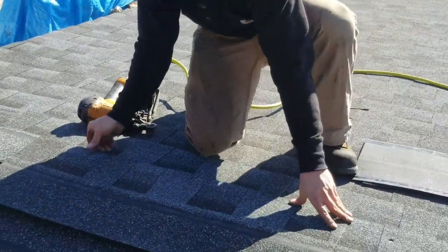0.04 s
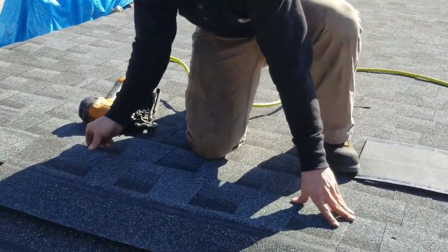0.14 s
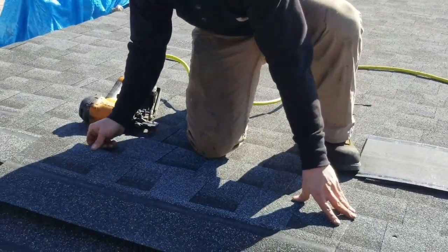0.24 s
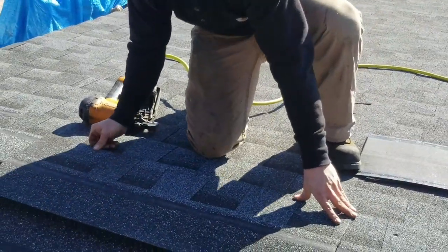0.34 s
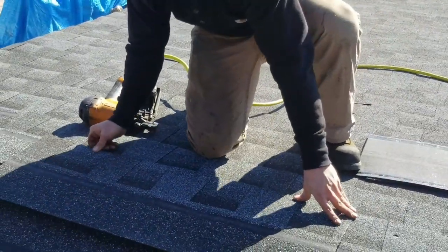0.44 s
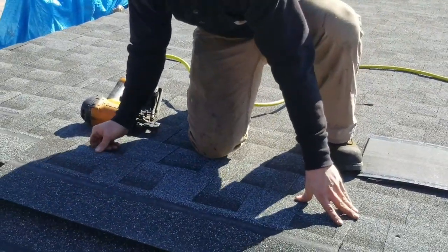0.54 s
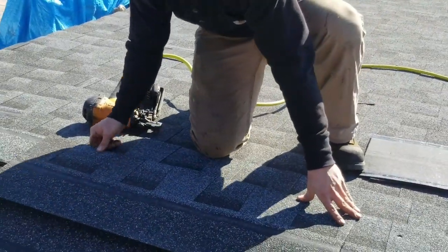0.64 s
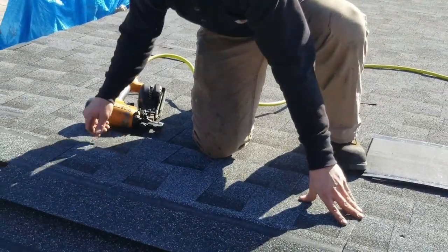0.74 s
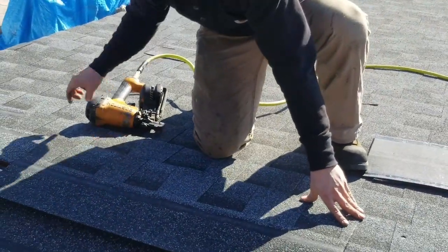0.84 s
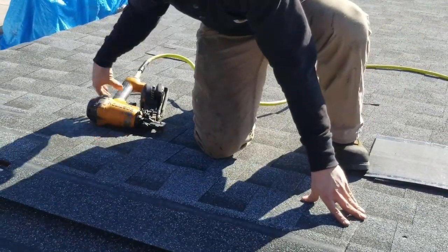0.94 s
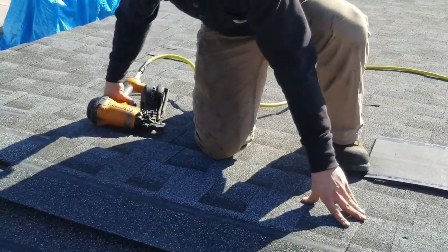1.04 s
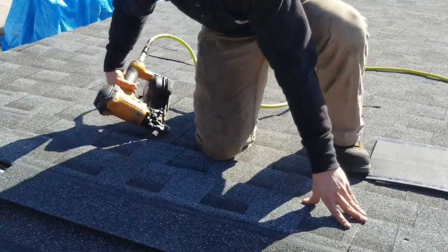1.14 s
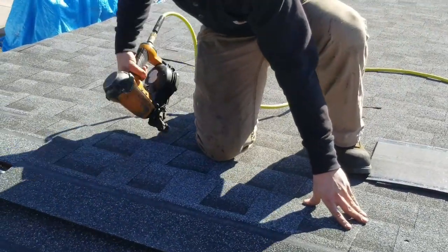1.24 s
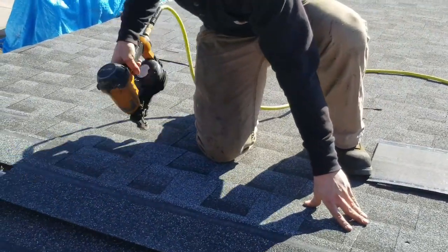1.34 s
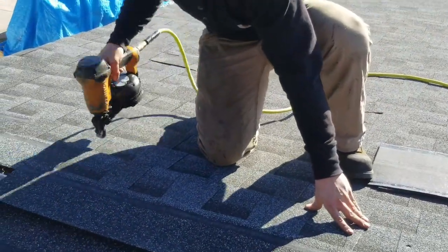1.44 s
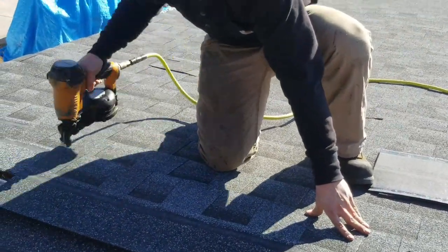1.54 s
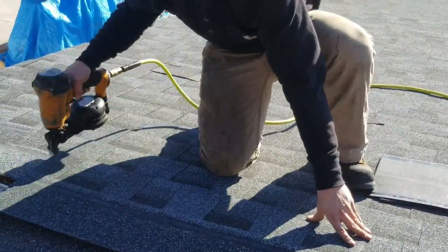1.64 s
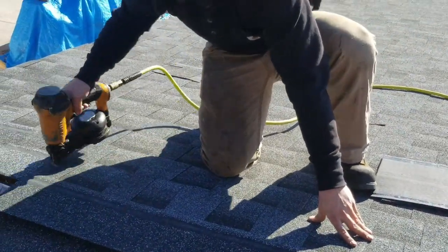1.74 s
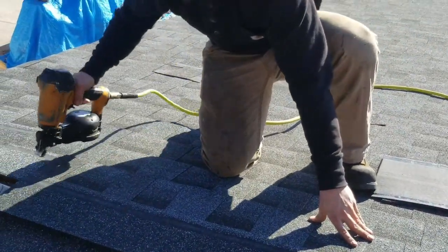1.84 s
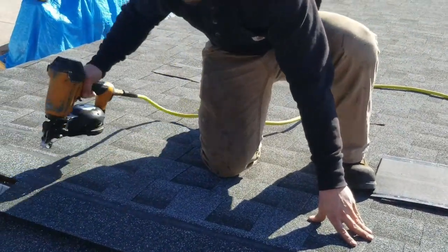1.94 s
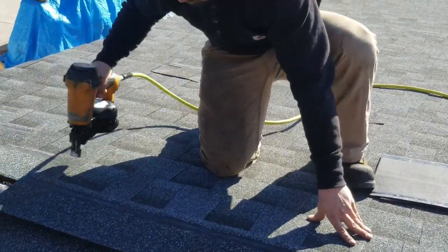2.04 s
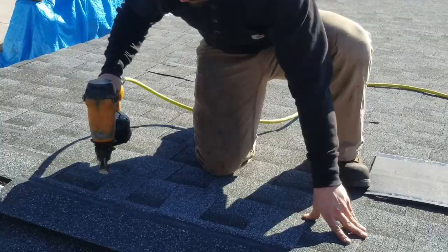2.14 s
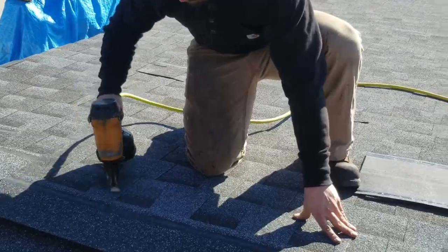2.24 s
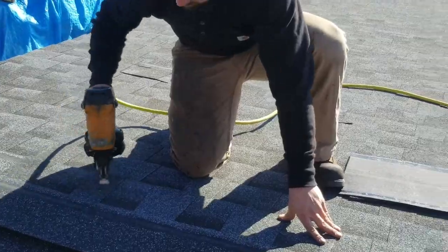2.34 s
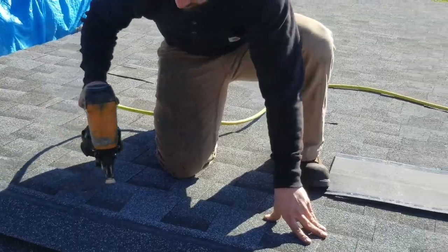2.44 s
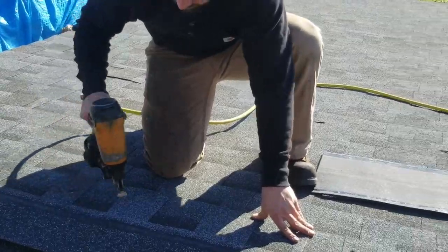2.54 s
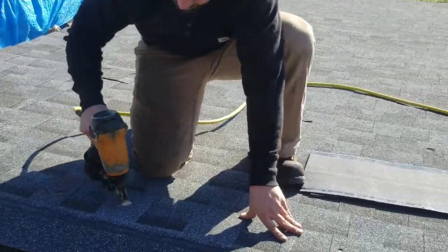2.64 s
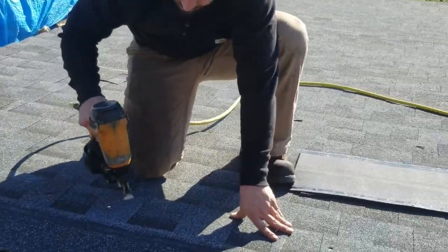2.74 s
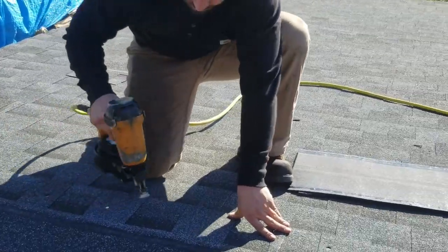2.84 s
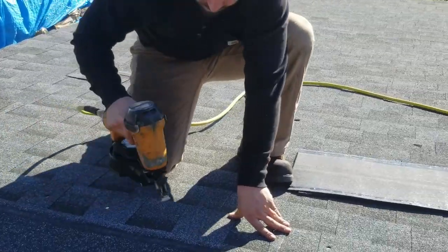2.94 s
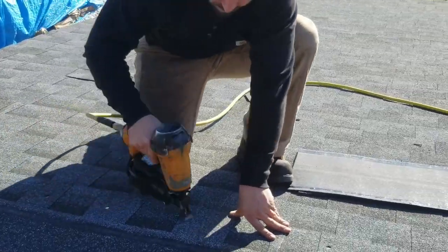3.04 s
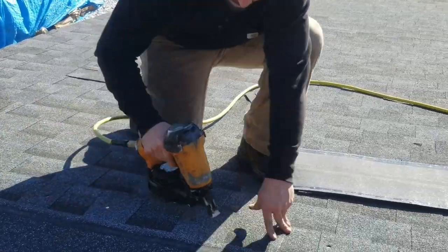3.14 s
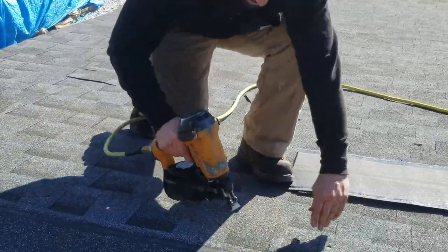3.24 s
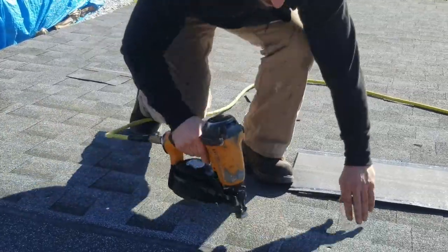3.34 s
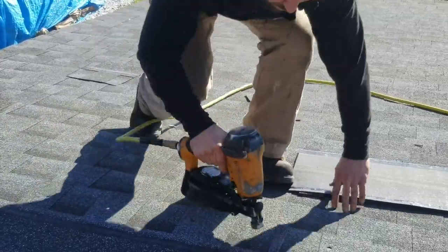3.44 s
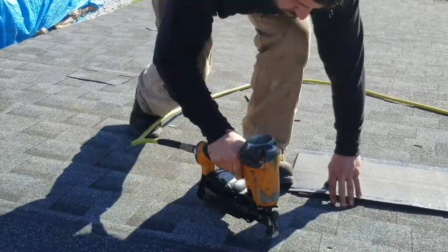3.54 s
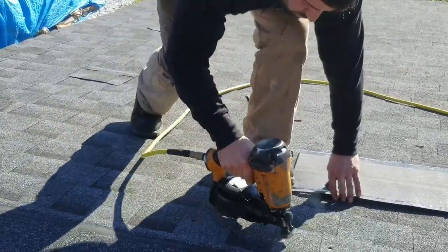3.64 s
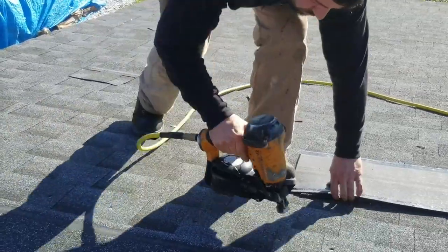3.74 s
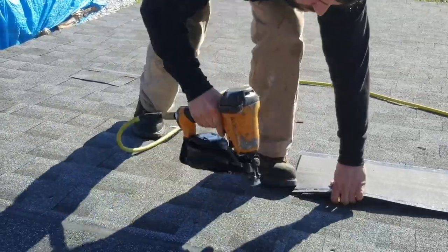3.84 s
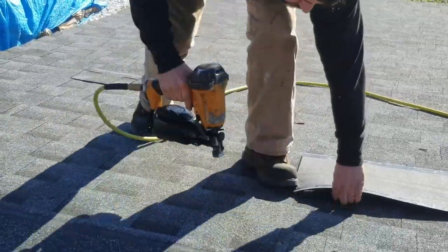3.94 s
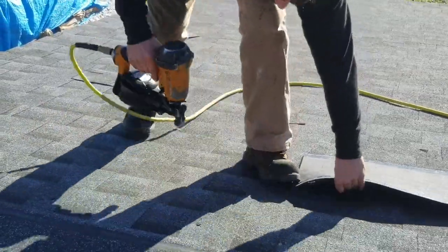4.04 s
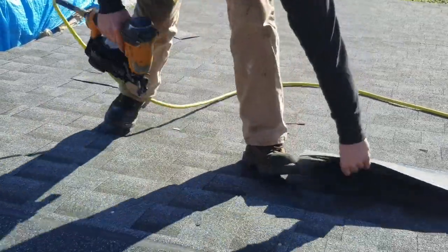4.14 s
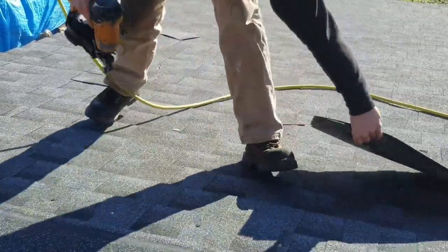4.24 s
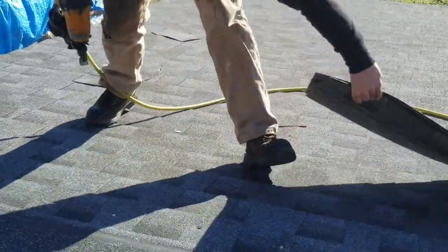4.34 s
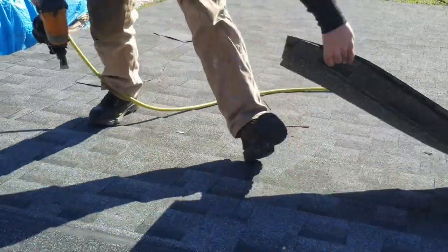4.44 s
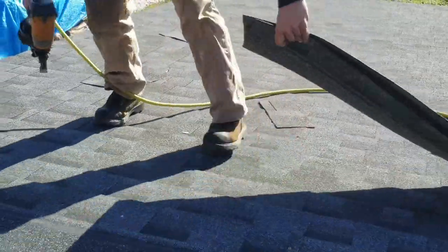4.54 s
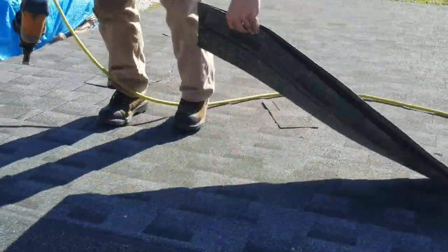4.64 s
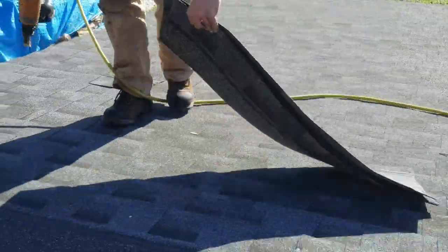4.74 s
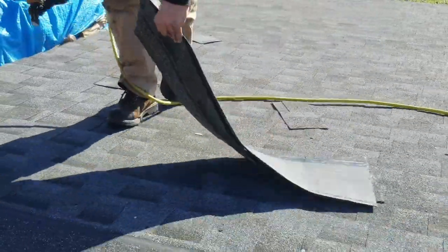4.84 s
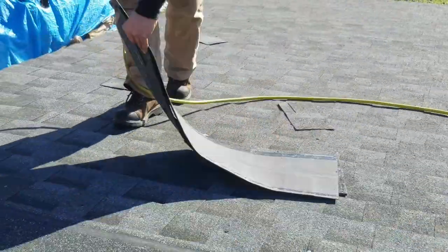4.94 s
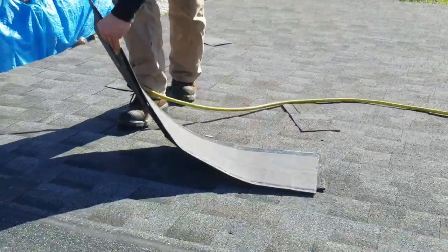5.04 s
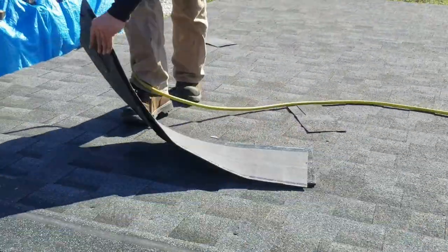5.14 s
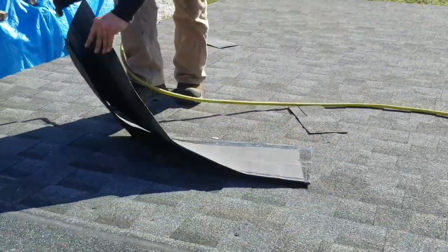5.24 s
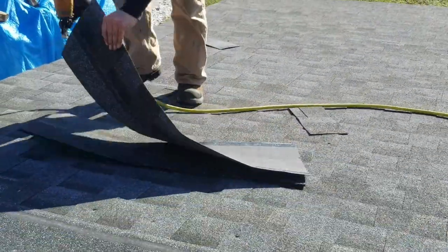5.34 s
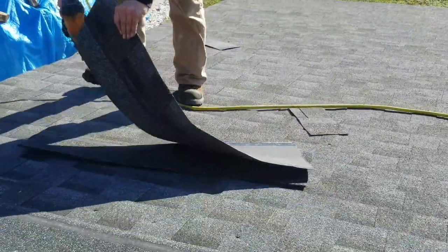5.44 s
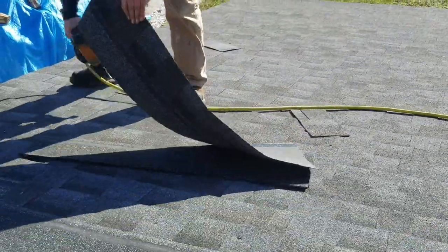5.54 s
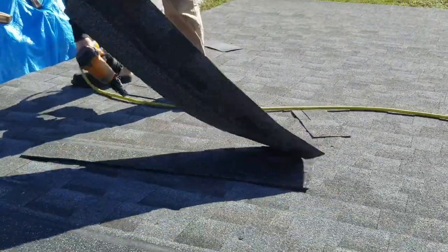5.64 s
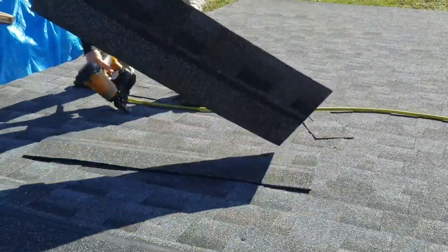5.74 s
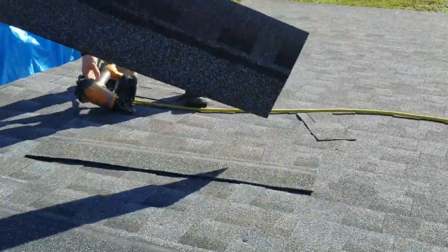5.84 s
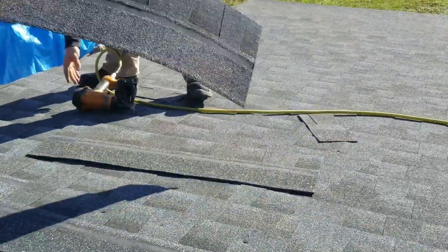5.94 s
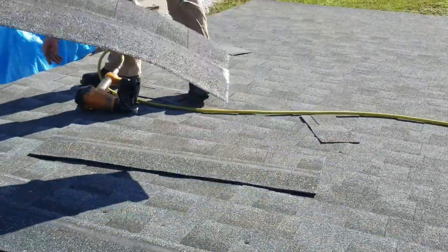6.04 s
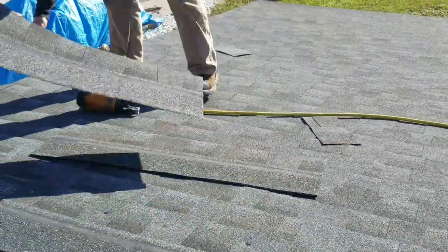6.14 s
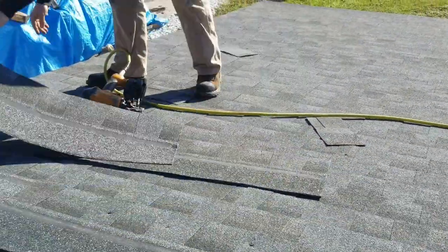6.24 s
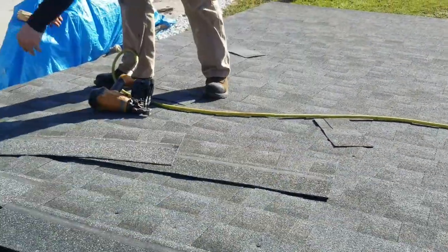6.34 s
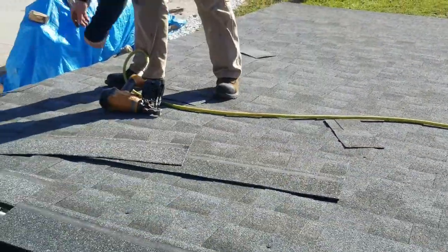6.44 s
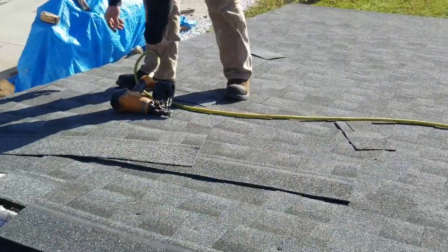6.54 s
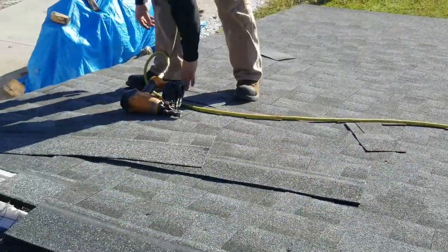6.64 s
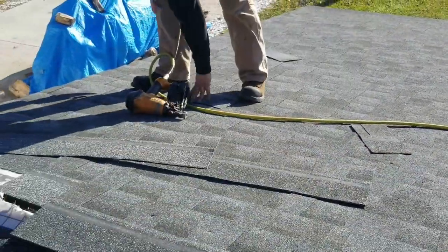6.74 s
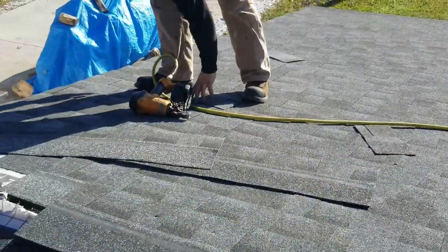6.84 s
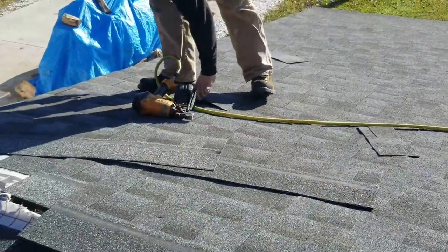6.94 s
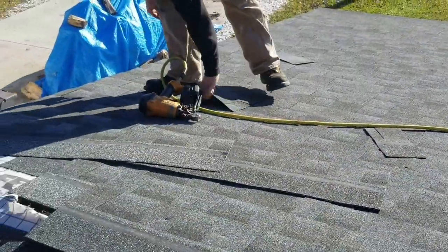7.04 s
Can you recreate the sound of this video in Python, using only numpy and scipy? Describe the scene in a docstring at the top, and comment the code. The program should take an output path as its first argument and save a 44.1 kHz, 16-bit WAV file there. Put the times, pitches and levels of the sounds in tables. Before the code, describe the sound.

Close on a shingled roof outdoors, small knocks and gritty rubs come as a tool is picked up in buffeting wind. A pneumatic nailer fires five hard, steely cracks about half a second apart, each with a short wooden boom and puff of air. After a pause a stiff gritty shingle scrapes and is dragged, slaps the roof, and the tool is set down with clunks. Faint hum and thin echo lie behind.

```python
"""Nailing shingles on a roof

A roofer picks up an air-driven nailer and fires five nails through shingles into the wooden deck: noise bursts
for the nose, valve and blows, fading tones for deck and metal, and a shaped hiss for the exhaust.
He drags a gritty shingle (filtered ticks and hiss), sets the tool down and drops the shingle (slap and thud).
Light wind, a distant hum and a thin echo, all from filtered noise or slow tones, lie behind."""
import sys
import numpy as np
from scipy import signal
from scipy.fft import rfft, irfft
from scipy.io import wavfile
from scipy.ndimage import uniform_filter1d

SR = 44100
rng = np.random.default_rng(int(sys.argv[2]) if len(sys.argv) > 2 else 0)


def wrap_up_sound(samples):
    """Save the sound to the file named by the first command line argument, as 16-bit audio."""
    columns = np.atleast_2d(samples).T
    # keep every value between -1 and 1, then stretch to whole-number steps
    tamed = np.clip(columns, -1, 1)
    steps = np.round(tamed * 32767).astype(np.int16)
    wavfile.write(sys.argv[1], SR, steps)


N = 312580
T = np.arange(N) / SR  # time of every sample, in seconds

# All levels in the tables are relative: the functions add their own trims and filters.
# One row a nail: nose lands t/s, piston fires t/s, nose level/dB, blow level/dB, deck level/dB,
# exhaust level/dB, exhaust hold t/s, piston return level/dB
NAIL_SHOTS = [(1.8102, 1.8333, -9.5, -11, -2.5, -17, .031, -16),
              (2.281, 2.3037, -25, -11.5, -2.5, -14.5, .015, -26.5),
              (2.6670, 2.691, -26, -12.5, 0, -15, .011, -26.5),
              (3.1350, 3.1587, -28, -10.5, -4.5, -16.5, .014, -23),
              (3.6525, 3.6813, -29, -9, -2.5, -16.5, 0.012, -25.5)]
# Blows of one shot (valve, driver, nail seating, rebound):
# delay from firing t/s, level/dB, decay t/s, push on the deck level/dB
SHOT_BLOWS = [(-.0094, -2, 0.0028, -8), (.0002, 6, 0.0019, -3), (.0056, 3, .0034, 2),
              (0.016, -4, .0015, -33.5)]
VENT_S, RETURN_S = 0.0225, 0.050  # after firing: the exhaust opens; the piston knocks home
# Tones of the roof deck under the nail: f/Hz, level/dB, time to fall 60 dB t/s
DECK_TONES = [(110, -7, .07), (174, -13.5, 0.11), (254, -4, 0.1), (311, -6.5, 0.046), (686, -14, 0.078),
              (874, -1.5, 0.033), (1132, -7.5, .035), (1290, -3, 0.02)]
# Faint ringing of the tool's metal: f/Hz, level/dB, time to fall 60 dB t/s
METAL_TONES = [(2055, -20.5, 0.08), (2620, -26, .26), (3160, -13.5, 0.076), (3330, -11, 0.026),
               (4140, -22, 0.12), (5700, -25, .1), (6859, -26.5, .1), (13000, -57, .6)]
# Colour of blows on the steel tool: f/Hz, level/dB
STEEL_COLOUR = [(60, -39), (150, -8), (300, -11.5), (500, -14), (850, -9), (1300, -3.5), (1590, -5),
                (2100, 0.5), (2600, -5), (3150, -5.5), (3700, -8.5), (4600, -2.5), (6200, -1), (7200, -11),
                (8420, -32), (10500, -19), (16000, -20.5)]
# Colour of the exhaust air: f/Hz, level/dB
AIR_COLOUR = [(59, -46), (100, -19), (249, -25), (502, -27.5), (768, -17.5), (1480, -21.5), (1950, -16),
              (2470, -13), (3320, -8), (4380, -1.5), (5900, 1.5), (6840, 0.5), (7940, -18), (10700, -6),
              (16000, -12)]

# The tool knocks when picked up and set down, then skids on the grit:
# t/s, knock level/dB, brightness/dB per octave, skid level/dB
TOOL_KNOCKS = [(0.096, -24, -5.5, -64), (0.176, -31.5, -3, -44.5), (0.858, -33.5, -3.5, -62),
               (0.9744, -24, -3.5, -68), (1.276, -26.5, 7, -47), (1.615, -27, 0, -74),
               (5.8284, -18, 2, -39.5), (5.9621, -25, 4.5, -33.5), (6.0873, -30, -0.5, -47),
               (6.4351, -9.5, 1.5, -48), (7.0205, -33.5, 0.5, -49.5)]
PING_S = 1.8  # when the trigger rings
# Tones of the ringing trigger: f/Hz, level/dB, time to fall 60 dB t/s
TRIGGER_TONES = [(5030, -24, 0.028), (5800, -7, 0.027)]

# Lifting and dragging the shingle: t/s, level/dB, sheet resonance level/dB
SHINGLE_DRAG = [(4.0, -59.5, -2.5), (4.322, -50.5, -16), (4.378, -37, -35), (4.522, -37.5, -33),
                (4.578, -35.5, -0.5), (4.65, -44.5, -19), (4.734, -36.5, -7.5), (4.926, -23, -1.5),
                (5.238, -31, -6), (5.322, -25, -7), (5.435, -30, -1)]
SLIDES_S = 4.68  # the shingle's edge lifts and the whole sheet begins to slide
# Short rubs of hand, boot, tool and shingle on the grit:
# middle t/s, half length t/s, level/dB, sheet resonance level/dB
GRIT_RUBS = [(0.343, 0.042, -30.5, 4.5), (0.464, 0.016, -38.5, 3.5), (.719, 0.0028, -42.5, 8.5),
             (1.164, 0.01, -38.5, 2.5), (1.329, 0.015, -32.5, -23), (4.404, .065, -42, -19),
             (4.748, 0.037, -35, -67.5), (5.532, 0.061, -37, -7), (5.722, 0.064, -44, -10.5),
             (6.051, .009, -35.5, -23), (6.288, 0.023, -49, -38), (6.353, 0.023, -31, -4),
             (6.411, 0.013, -30.5, -15), (6.99, 0.076, -54, -36), (7.085, 0.021, -42, -67.5)]
# Colour of grit on grit: f/Hz, level/dB
GRIT_COLOUR = [(50, -18.5), (150, -5), (300, -5), (480, -11.5), (750, 2.5), (1300, 0.5), (1650, -2),
               (2600, -3.5), (3000, -2), (3500, -2.5), (4200, 0), (6300, -1), (8400, -23), (12000, -17),
               (16000, -24)]
# The stiff shingle's own resonance: f/Hz, level/dB
SHEET_COLOUR = [(600, -42), (1300, -15), (1750, -8), (1950, 2.5), (2200, -1), (2450, -9.5), (3200, -20),
                (6000, -42)]

# A shingle flaps onto the roof, or a boot lands: t/s, slap level/dB, slap decay t/s, thud level/dB
ROOF_SLAPS = [(0.0599, -16, 0.0031, -17.5), (.3490, -34.5, 0.0021, -28), (5.4500, -9, 0.0051, -16),
              (5.575, -31, 0.0066, -52), (5.604, -38.5, 0.0039, -24.5), (6.3488, -29, 0.0022, -24.5),
              (6.4341, -17.5, 0.0015, -27.5), (6.4375, -26.5, 0.0093, -20.5)]
# Colour of the slap: f/Hz, level/dB
SLAP_COLOUR = [(50, -29.5), (150, -2.5), (300, -2.5), (520, -20), (800, -7), (1250, -15), (2100, -2),
               (3000, -11.5), (3700, -16), (4900, -8), (6500, -11), (8200, -45), (12400, -28), (16000, -43)]
# Tones of the roof under a broad soft load: f/Hz, level/dB, time to fall 60 dB t/s
ROOF_TONES = [(62, -27, 0.078), (116.4, -1.5, 0.087), (166, -10, 0.14), (266, 2.5, 0.063),
              (315, -12, 0.058), (605, 0, 0.039)]

# Colour of the echo: f/Hz, level/dB
ECHO_COLOUR = [(100, -18.5), (400, -17.5), (1000, -2), (2500, 2.5), (6000, -1), (10000, -4.5),
               (16000, -1.5)]
# Wind gusts: peak t/s, time from the peak down to 37 % t/s, level/dB
WIND_GUSTS = [(0.33, 0.1, -31), (0.895, 1, -44), (1.277, 0.033, -36), (1.768, 0.028, -30),
              (4.26, 0.097, -26), (5.55, 0.47, -34), (7.034, 0.3, -26)]
# Single buffets of wind, strongest in the right channel: t/s, level/dB
WIND_BUFFETS = [(.284, -10.5), (0.364, -3.5), (1.205, -8.5), (1.244, -16.5), (1.737, -11.5)]
# Colour of the wind rumble: f/Hz, level/dB
WIND_COLOUR = [(15, -14), (35, -2), (80, -2.5), (140, -10), (250, -17.5), (600, -43.5), (2000, -73.5)]
BREEZE_DB = -55  # steady wind between gusts, on the same scale as the gusts
BUFFET_S = 0.0065  # time scale of one eddy
# Colour of the outdoor murmur: f/Hz, level/dB
YARD_COLOUR = [(35, -27.5), (60, -4.5), (153, 0), (371, -9.5), (417, -3.5), (458, -12), (698, -14.5),
               (749, -15.5), (1250, -24), (1700, -20.5), (3420, -31), (5720, -28.5), (8120, -56),
               (13300, -48.5), (16000, -58)]
# Hum of a distant machine: f/Hz, level/dB
HUM_TONES = [(149, -45.5), (283, -46), (421, -48.5), (679, -52.5)]
# Level of the whole background, which sinks and partly returns: t/s, level/dB
BACKGROUND_LEVEL = [(0, 1), (1.85, 0.5), (2.0, -8.5), (2.8, -17.5), (4.3, -16.5), (5.6, -6.5), (7.09, -11)]

# How alike the two microphone ports hear: f/Hz, likeness/1 (limited to -1..1 when used)
PORT_LIKENESS = [(30, 2.5), (250, 0.5), (700, 0.83), (1300, 0.08), (2100, 0.48), (3200, 0.33), (5000, 0.09),
                 (16000, 0)]
# How much louder the left port is than the right: f/Hz, level/dB
PORT_LEAD = [(100, 6.5), (300, -3), (700, 4), (1300, 2), (2200, 1.3), (3400, 2.5), (4400, 7.5), (5200, 12),
             (6200, 16.5), (7200, 6), (8600, -4), (10500, 1.5), (12500, -1), (15500, 12.5)]
EDGE_HZ = 16100  # upper limit of the sound


def amp(db):
    """Turns decibels into gain."""
    return 10 ** (np.asarray(db) / 20)


def evened(x):
    """Scales a sound to an average strength (rms) of 1."""
    return x / np.sqrt(np.mean(x ** 2) + 1e-20)


def read(points, hz):
    """Reads a table of values over pitch, joined by straight lines on a log-frequency axis."""
    table_hz, value = np.transpose(points)
    return np.interp(np.log(hz + 1), np.log(table_hz + 1), value)


def curve(rows):
    """Reads every column of a time table at every sample."""
    s, *columns = np.transpose(rows)
    return [np.interp(T, s, column) for column in columns]


def add(mix, s, sound):
    """Mixes a sound in at time s."""
    part = mix[..., max(round(s * SR), 0):][..., :sound.shape[-1]]
    part += sound[..., :part.shape[-1]]


def colour(x, spectrum, size=2048, keep_power=True):
    """Filters a sound to the given spectrum without any sound before its start (minimum phase)."""
    hz = abs(np.fft.fftfreq(size, 1 / SR))
    log_gain = np.log(amp(read(spectrum, hz)))
    taps = np.fft.ifft(np.exp(np.conj(signal.hilbert(log_gain)))).real
    if keep_power:
        taps = taps / np.linalg.norm(taps)
    return signal.oaconvolve(x, taps[None], axes=1)[:, :x.shape[1]]


def tilted(spectrum, slope_db):
    """Makes a spectrum brighter or duller by a slope per octave, which levels off at 9 kHz."""
    return [(hz, db + slope_db * np.log2(min(hz, 9000))) for hz, db in spectrum]


def high_pass(x, order, lowest_hz):
    """Takes away the bass below lowest_hz."""
    return signal.sosfilt(signal.butter(order, lowest_hz, "high", fs=SR, output="sos"), x)


def ports(x, lag_s=0):
    """Makes two draws a stereo pair, more alike in the bass; the right port hears lag_s later."""
    left, other = rfft(x)
    hz = np.fft.rfftfreq(N, 1 / SR)
    same = np.clip(read(PORT_LIKENESS, hz), -1, 1)
    right = same * left + np.sqrt(1 - same ** 2) * other
    return irfft([left, right * np.exp(-2j * np.pi * hz * lag_s)], N)


def wander(hz):
    """Makes a random drift of rms 1 from noise with only changes slower than about hz kept."""
    keep = np.exp(-(np.fft.rfftfreq(N, 1 / SR) / hz) ** 2)
    return evened(irfft(rfft(rng.standard_normal(N)) * keep, N))


def crack(decay_s, size=4096):
    """Contact noise that starts at once and dies away; equal decays carry equal energy."""
    shape = np.exp(-T[:size] / max(decay_s, 1 / SR))
    burst = rng.standard_normal((2, size)) * shape
    return burst * np.linalg.norm(shape) / np.linalg.norm(burst, axis=1, keepdims=True)


def ring(tones, detune, size=22050):
    """Adds up fading tones of a struck body, each shifted a little in pitch on every call."""
    t = T[:size]
    sound = 0
    for hz, db, t60 in tones:
        struck_hz = hz * (1 + detune * rng.uniform(-1, 1))
        sound = sound + amp(db - 60 * t / t60) * np.sin(2 * np.pi * struck_hz * t)
    return sound


def uneven(x, spread_db, count=28):
    """Puts random peaks and dips in the spectrum: no two blows strike the housing alike."""
    bumps = np.c_[np.geomspace(500, 14000, count), spread_db * rng.standard_normal(count)]
    return colour(x, bumps, size=512)


def nailer(deck_db=-3, metal_db=-2, nose_decay_s=0.002, nose_slope_db=-4.5, settle_db=-8,
           settle_decay_s=0.023, rattle_db=-14, rattle_decay_s=0.016,
           return_decay_s=0.0091, return_slope_db=-1, lowest_hz=90):
    """The nose lands; blows crack in steel and boom in the deck; the piston knocks home."""
    nose, steel, home = np.zeros((2, N)), np.zeros((2, N)), np.zeros((2, N))
    body = np.zeros(N)
    for landed, fired, nose_db, blow_db, boom_db, *_, return_db in NAIL_SHOTS:
        add(nose, landed, amp(nose_db) * crack(nose_decay_s))
        add(steel, landed, amp(nose_db + settle_db) * crack(settle_decay_s))
        deck = ring(DECK_TONES, detune=0.06)  # each nail meets a different spot of the deck
        for delay, db, decay_s, push_db in SHOT_BLOWS:
            blow = crack(decay_s) + amp(rattle_db) * crack(rattle_decay_s)
            add(steel, fired + delay, amp(blow_db + db) * uneven(blow, spread_db=3))
            add(body, fired + delay, amp(blow_db + boom_db + push_db + deck_db) * deck)
        add(body, fired, amp(blow_db + metal_db) * ring(METAL_TONES, detune=0.0022))
        add(home, fired + RETURN_S, amp(return_db) * crack(return_decay_s))
    cracks = colour(steel, STEEL_COLOUR)
    cracks += colour(nose, tilted(STEEL_COLOUR, nose_slope_db))
    cracks += colour(home, tilted(STEEL_COLOUR, return_slope_db))
    # the deck's boom carries no deep bass
    return ports(cracks, lag_s=0.00009) + high_pass(body, 4, lowest_hz)


def exhaust(opening_s=0.00077, spit_db=-2, spit_decay_s=0.0018, emptying_s=0.013, flutter_db=1.0,
            sag_db_per_s=60, shuts_s=0.044, shutting_s=0.015):
    """The valve spits and vents the cylinder: a rough jet of air that holds briefly, then fades."""
    flow, t = np.zeros(N), T[:SR // 4]
    for _, fired, *_, db, hold_s, _ in NAIL_SHOTS:
        # the fade grows steeper once the valve starts to shut
        fading = np.maximum(t - hold_s, 0) / emptying_s + np.maximum(t - shuts_s, 0) / shutting_s
        jet = np.exp(-fading) + amp(spit_db) * np.exp(-t / spit_decay_s)
        opened = np.minimum(t / opening_s, 1)
        add(flow, fired + VENT_S, amp(db - sag_db_per_s * t) * opened * jet)
    hiss = rng.standard_normal((2, N)) * flow * amp(flutter_db * wander(350))
    return ports(colour(hiss, AIR_COLOUR), lag_s=0.0001)


def granules(per_s, spread_db, hiss):
    """Mineral granules catch and slip: ticks of very unequal size over a fine hiss."""
    happens = rng.random(N) < per_s / SR
    size = amp(spread_db * np.minimum(rng.exponential(1, N), 5)) * happens
    ticks = evened(size * rng.standard_normal((2, N)))
    return evened(ticks + hiss * rng.standard_normal((2, N)))


def handling(decay_s=0.0027, skid_decay_s=0.048, judder_db=3, skid_slope_db=0.0):
    """The tool's housing knocks, then skids and judders on the grit; once the trigger rings."""
    knocks, force = np.zeros((2, N)), np.zeros(N)
    for s, db, slope_db, skid_db in TOOL_KNOCKS:
        add(knocks, s, amp(db) * colour(crack(decay_s), tilted(STEEL_COLOUR, slope_db)))
        add(force, s, amp(skid_db) * np.exp(-T[:SR // 2] / skid_decay_s))
    add(knocks, PING_S, ring(TRIGGER_TONES, detune=0.0018))
    judder = amp(judder_db * wander(60))
    skid = force * judder * granules(per_s=4000, spread_db=3.5, hiss=0.6)
    return ports(knocks + colour(skid, tilted(STEEL_COLOUR, skid_slope_db)), lag_s=0.00006)


def off_the_roof(x, delay_s=0.00072, drift=0.06, share=0.33, edge_share=0.7):
    """The roof mirrors a moving contact: a delayed copy makes sliding hollow bands, deepest on an edge."""
    earlier = T - delay_s * np.exp(drift * wander(5))
    on_edge = (T > SHINGLE_DRAG[0][0]) & (T < SLIDES_S)
    depth = np.where(on_edge, edge_share, share)
    mirrored = np.array([np.interp(earlier, T, channel) for channel in x])
    return (x + depth * mirrored) / np.hypot(1, depth)


def patchy(x, spread_db, size=512):
    """Patches of the spectrum swell and fade as the contact moves over the grit."""
    z = signal.stft(x, nperseg=size)[2]
    field = uniform_filter1d(rng.standard_normal(z.shape[1:]), 6, 0)  # smooth over pitch
    field = evened(uniform_filter1d(field, 7, 1))  # smooth over time
    gain = evened(amp(spread_db * field))
    return signal.istft(z * gain, nperseg=size)[1][:, :N]


def scraping(judder_db=1.77, sheet_db=0, drag_db=-1, release_s=0.024, rub_slope_db=-0.6, dulling=0.091):
    """Grit rubs on grit in a long drag and short strokes, and rings the sheet; more ring, duller stroke."""
    level_db, sing_db = curve(SHINGLE_DRAG)
    outside = abs(T - np.clip(T, SHINGLE_DRAG[0][0], SHINGLE_DRAG[-1][0]))  # seconds from the drag
    force = amp(drag_db + level_db + judder_db * wander(49)) * np.exp(-outside / release_s)
    rasp = colour(force * granules(per_s=3500, spread_db=2.5, hiss=0.74), GRIT_COLOUR)
    sing = force * amp(sing_db)
    grit = granules(per_s=3000, spread_db=7.5, hiss=1.0)
    for s, half, db, ring_db in GRIT_RUBS:
        start = max(s - 2 * half, 0)
        span = slice(round(start * SR), round((s + 2 * half) * SR) + 200)
        stroke = amp(db) * np.exp(-((T[span] - s) / half) ** 4 / 2)  # flat top, soft ends
        rub_colour = tilted(GRIT_COLOUR, rub_slope_db - dulling * ring_db)
        add(rasp, start, colour(stroke * grit[:, span], rub_colour))
        add(sing, start, stroke * amp(ring_db))
    sheet = colour(sing * granules(per_s=1500, spread_db=0.5, hiss=0.78), SHEET_COLOUR)
    return ports(patchy(off_the_roof(rasp) + amp(sheet_db) * sheet, spread_db=1.66))


def slaps(thud_level_db=-4, lowest_hz=45):
    """A flat slap on top is a noise burst; the roof's dull thud below is a set of fading tones."""
    slap, thud = np.zeros((2, N)), np.zeros(N)
    for s, db, decay_s, thud_db in ROOF_SLAPS:
        add(slap, s, amp(db) * crack(decay_s))
        add(thud, s, amp(thud_db + thud_level_db) * ring(ROOF_TONES, detune=0.28))
    return ports(colour(slap, SLAP_COLOUR)) + high_pass(thud, 2, lowest_hz)


def echo(x, t60_s=0.48, rise_s=0.018):
    """Walls and trees around the house scatter a thin tail of random reflections back."""
    t = T[:SR]
    reflections = rng.standard_normal((2, SR)) * (rng.random((2, SR)) < 3000 / SR)  # 3000 a second
    fade = amp(-60 * t / t60_s) * (1 - np.exp(-t / rise_s))
    tail = colour(reflections * fade, ECHO_COLOUR)
    return signal.fftconvolve(x, tail / np.linalg.norm(tail[0]), axes=1)[:, :N]


def wind(level_db=-3, lumps_db=1.5, right_db=5.5, leak_db=-20):
    """Turbulent air makes a lumpy rumble, separate at each port, stronger on the right, with buffets."""
    strength = amp(BREEZE_DB)
    for s, half, db in WIND_GUSTS:
        strength = strength + amp(db) * np.exp(-((T - s) / half) ** 2)
    rumble = colour(rng.standard_normal((2, N)), WIND_COLOUR, size=8192)
    rumble = rumble * strength * amp(level_db + lumps_db * wander(13))
    rumble = rumble * amp([[-right_db], [right_db]])
    u = T[:4096] / BUFFET_S
    swell = np.e * u * np.exp(-u)
    eddy = swell * np.sin(2 * np.pi * u / 1.4) * np.exp(-u / 2)  # a push and a pull
    for s, db in WIND_BUFFETS:
        add(rumble, s, amp([[db + leak_db], [db]]) * eddy)
    return rumble


def yard(air_db=-38, swell_db=0.64, hum_db=-3, waver_hz=3):
    """Filtered noise murmurs like air and far traffic; tones of unsteady pitch and level hum."""
    air = ports(colour(rng.standard_normal((2, N)), YARD_COLOUR))
    air = air * amp(air_db + swell_db * wander(2.7))
    hum = np.zeros(N)
    for hz, db in HUM_TONES:
        level = amp(db + 2.5 * wander(5.4))
        turns = np.cumsum(hz + waver_hz * wander(8.9)) / SR
        hum += level * np.sin(2 * np.pi * turns)
    return air + amp(hum_db) * hum


def scene(echo_db=-15):
    """Adds the close work on the roof to the wind, yard and echo behind it."""
    near = nailer() + exhaust() + handling() + scraping() + slaps()
    background_db, = curve(BACKGROUND_LEVEL)
    return near + amp(background_db) * (yard() + wind() + amp(echo_db) * echo(near))


def record(dry):
    """Gives each port its own tone colour, rounds off the peaks and cuts the highest treble."""
    hz, lead_db = np.transpose(PORT_LEAD)
    mean_db = 10 * np.log10((amp(lead_db) + amp(-lead_db)) / 2)  # keeps the two ports' mean power
    pair = []
    for x, side in zip(dry, (1, -1)):
        port_colour = np.c_[hz, side * lead_db / 2 - mean_db]
        pair.append(colour(x[None], port_colour, keep_power=False))
    rounded = np.tanh(np.vstack(pair))
    low_pass = signal.firwin(401, EDGE_HZ, window=("kaiser", 9), fs=SR)
    return signal.oaconvolve(rounded, low_pass[None], "same")


dry = scene()
out = record(dry)
wrap_up_sound(out)
```